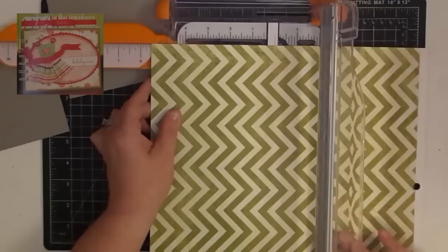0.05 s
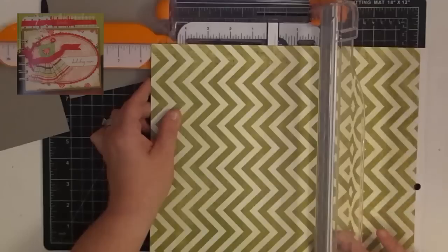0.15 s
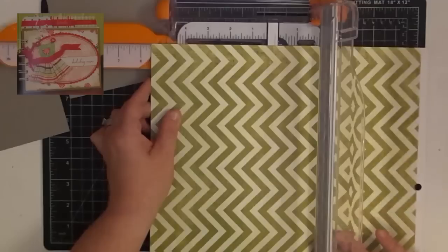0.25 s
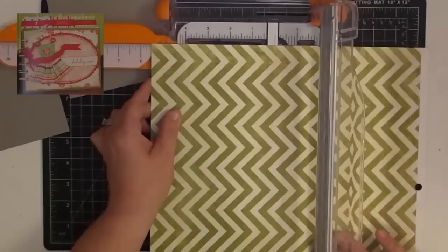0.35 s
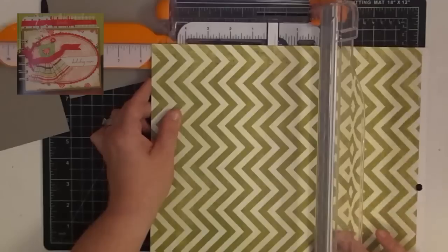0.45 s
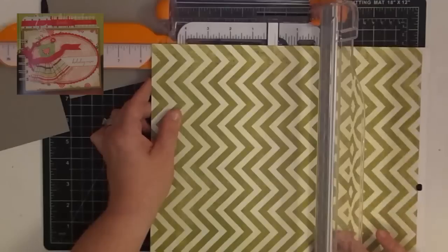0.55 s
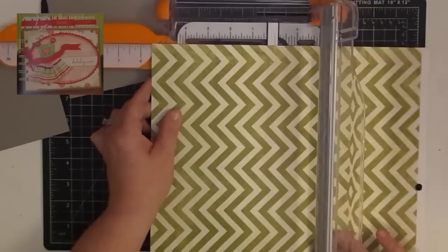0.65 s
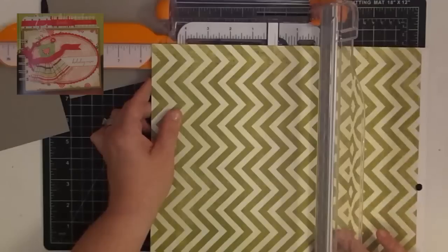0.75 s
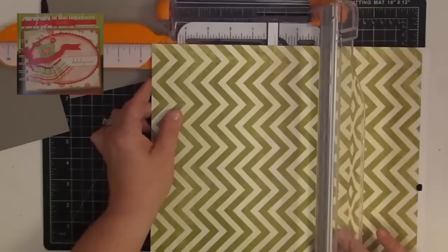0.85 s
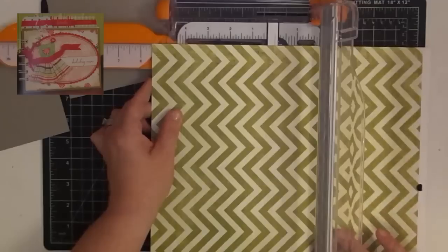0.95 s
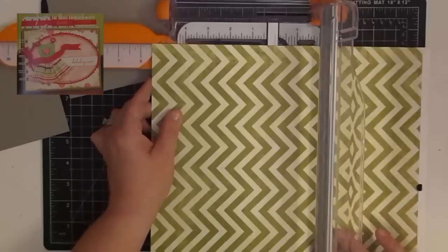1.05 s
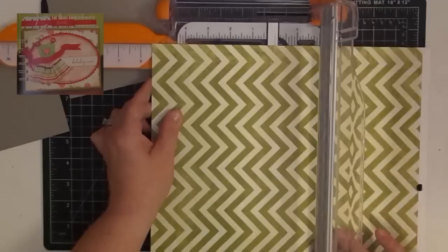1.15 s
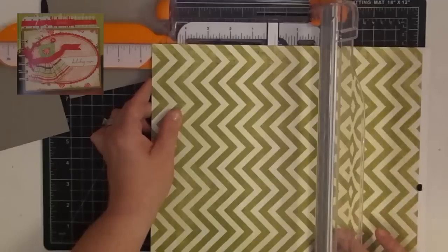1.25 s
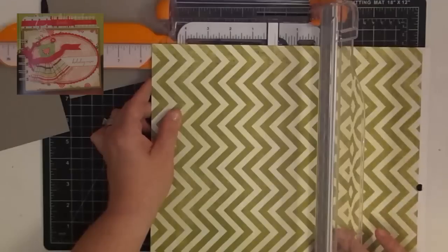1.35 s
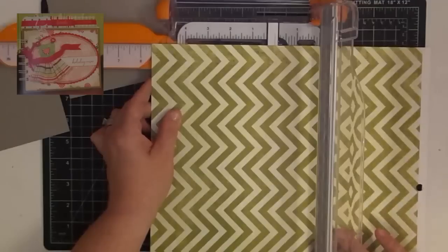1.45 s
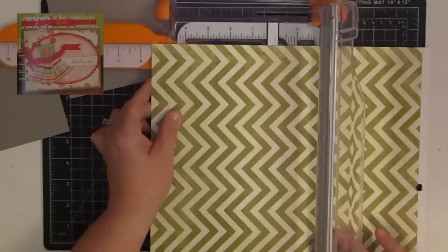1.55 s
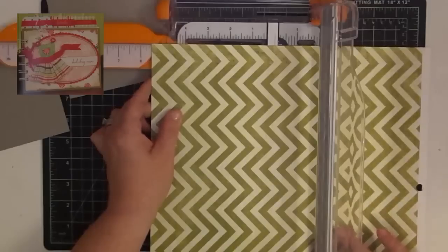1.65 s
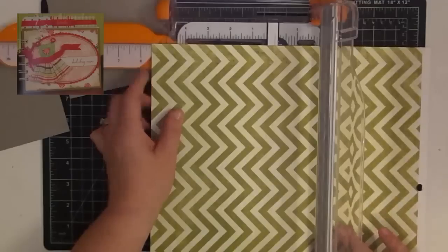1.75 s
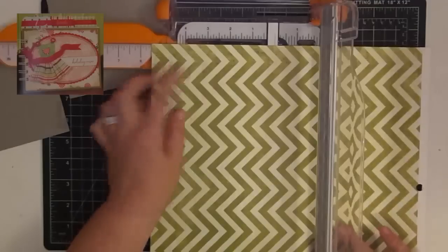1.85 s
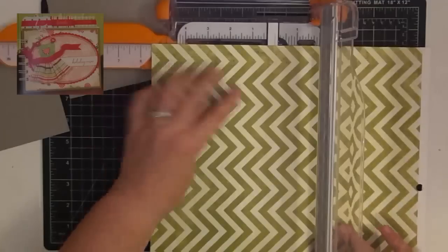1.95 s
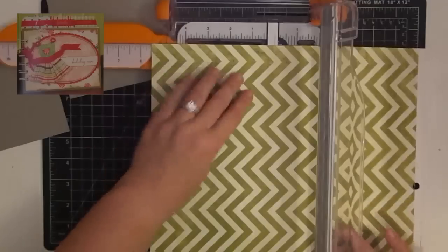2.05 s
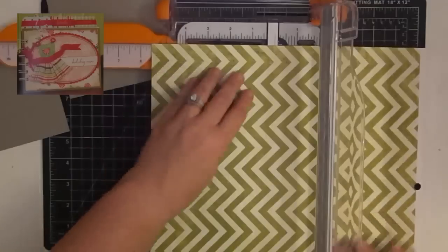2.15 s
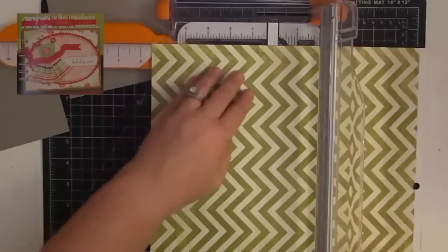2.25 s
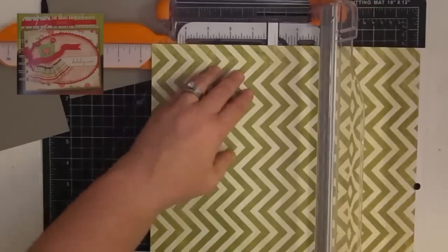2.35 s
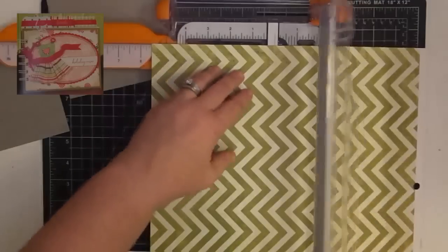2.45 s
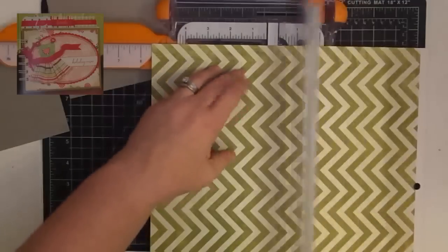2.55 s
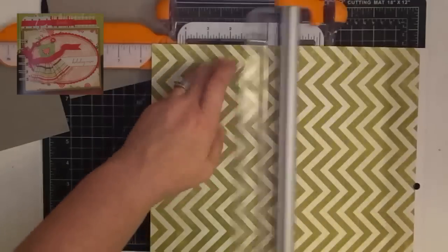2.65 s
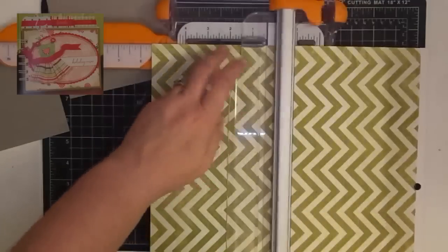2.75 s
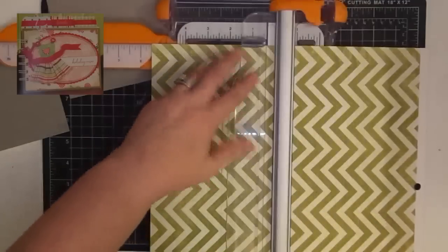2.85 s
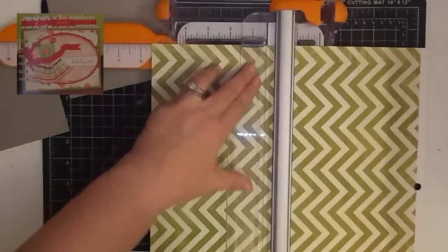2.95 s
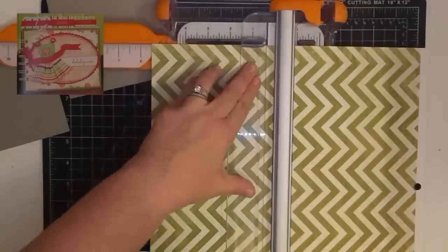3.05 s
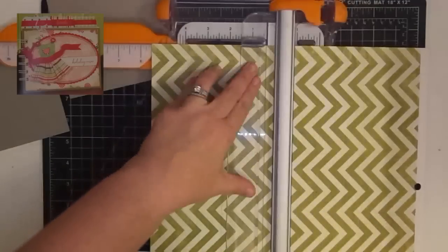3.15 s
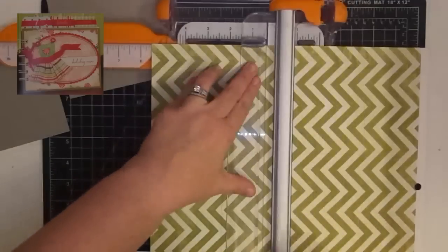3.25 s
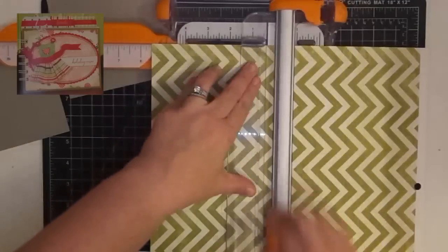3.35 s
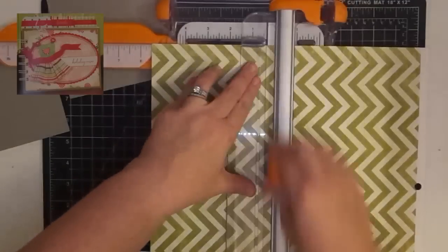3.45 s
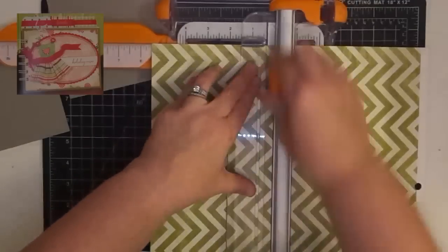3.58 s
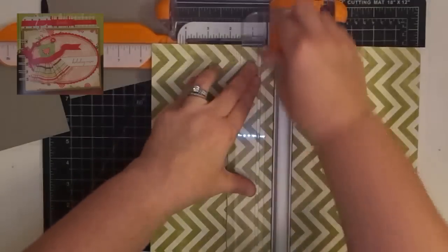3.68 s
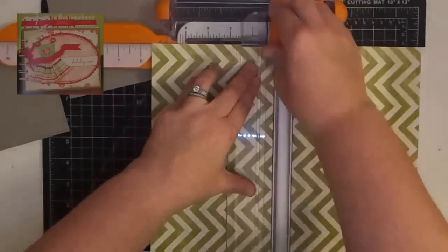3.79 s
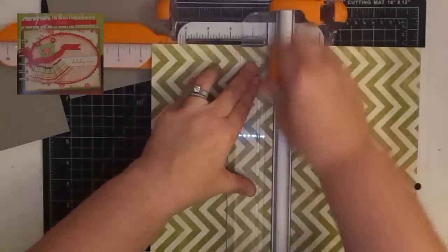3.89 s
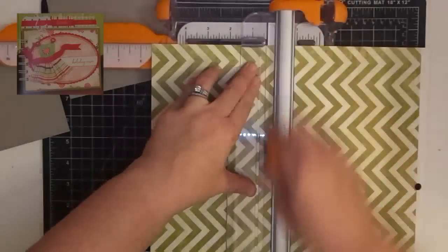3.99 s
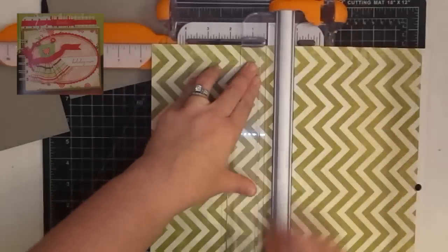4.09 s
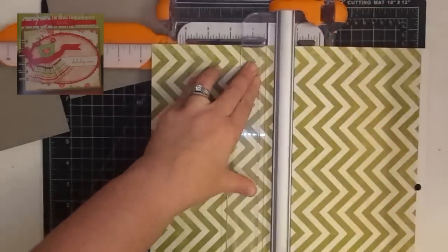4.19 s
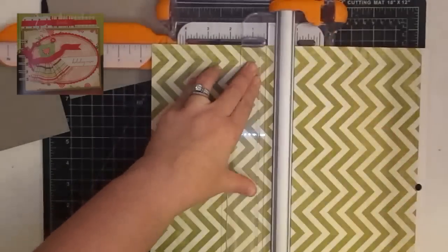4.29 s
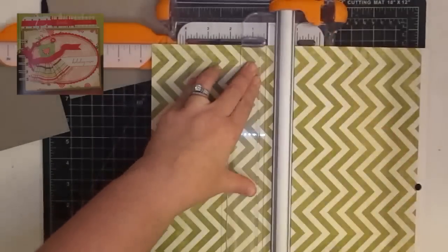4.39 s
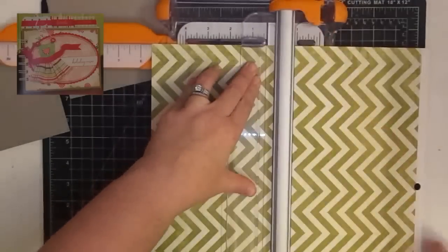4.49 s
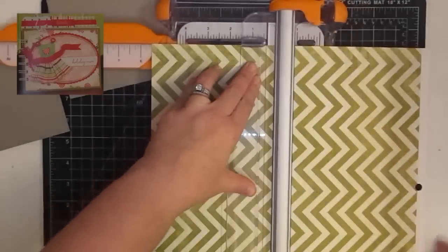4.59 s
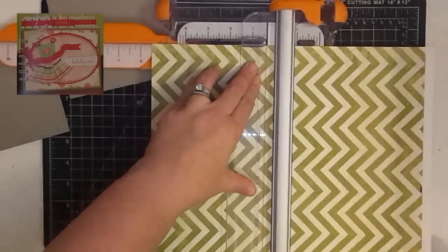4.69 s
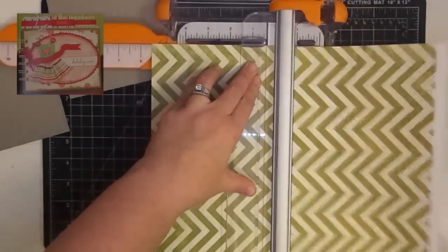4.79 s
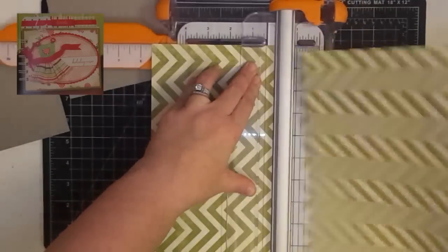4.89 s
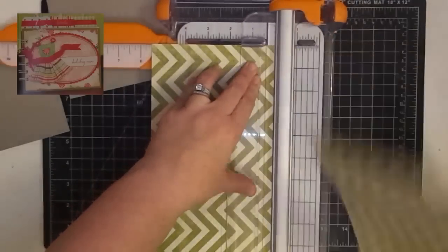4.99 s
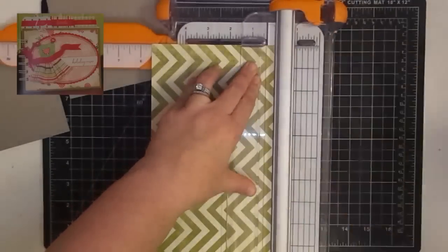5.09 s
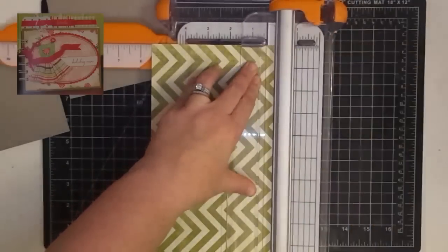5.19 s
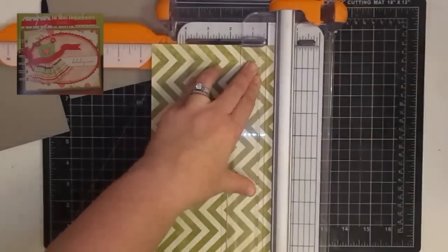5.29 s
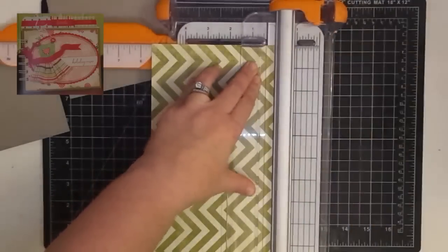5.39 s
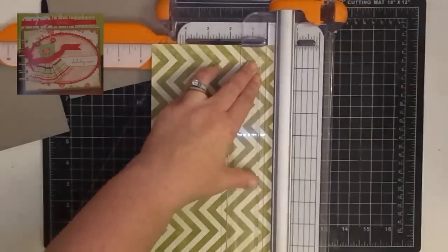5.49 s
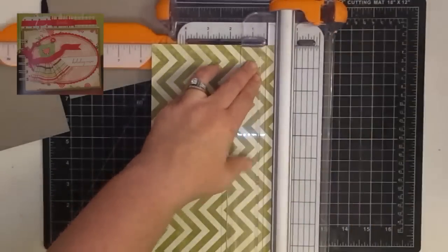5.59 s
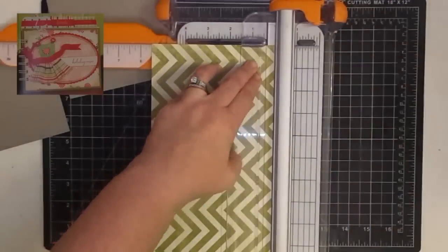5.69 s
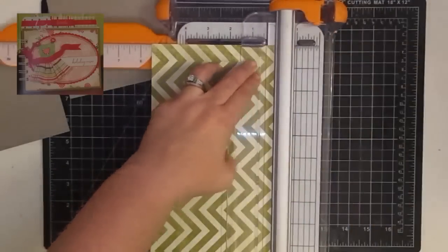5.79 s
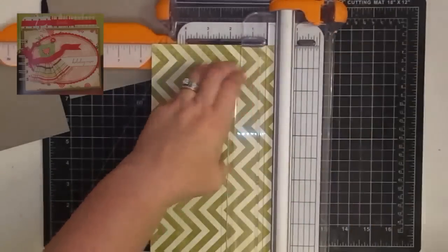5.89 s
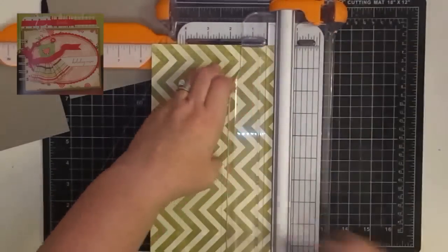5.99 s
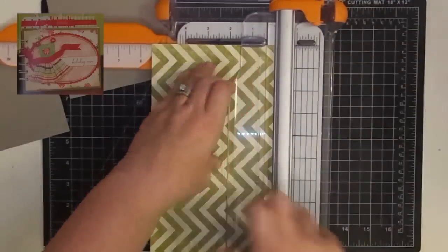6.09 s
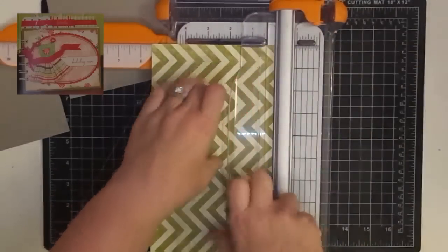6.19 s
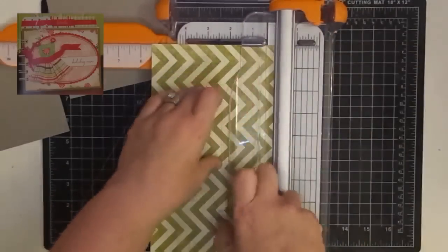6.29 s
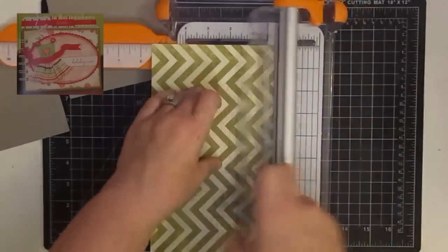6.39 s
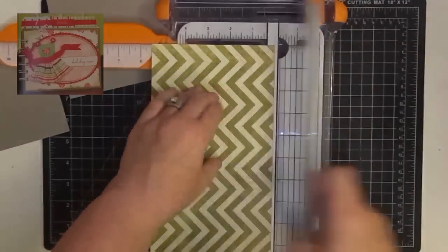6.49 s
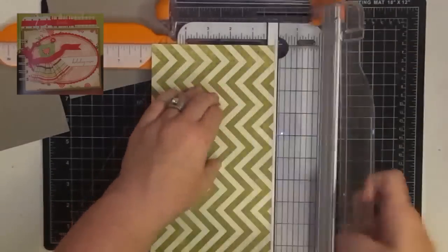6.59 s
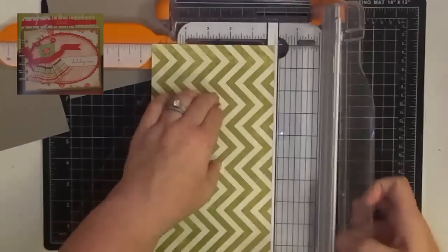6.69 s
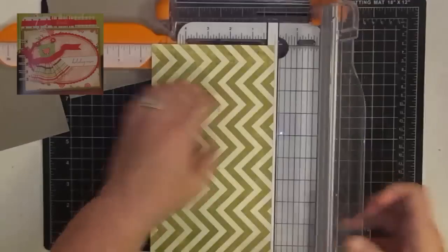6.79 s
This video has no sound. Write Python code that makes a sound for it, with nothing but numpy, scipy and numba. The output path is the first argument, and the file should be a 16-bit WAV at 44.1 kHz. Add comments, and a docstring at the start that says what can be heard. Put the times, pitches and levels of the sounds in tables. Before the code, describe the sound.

On a craft table, a paper trimmer is heard over low room noise. Faint rubbing leads to one very loud plastic slam with a short rattle and table thump. Small clicks precede a bright tearing scrape, then a quieter, rumblier slide back. Paper swishes and flicks as the cut piece is lifted; sparse soft knocks end it. One nearby microphone catches the short reflections of a small room.

```python
"""On a craft table in a small room, a plastic paper trimmer is heard by one microphone overhead.
A hand slides a sheet into place, the rail slams down and latches, the blade cuts and is drawn back.
The offcut is lifted and dropped aside, fingers shift on the sheet and the rail is swung open again.
Impacts excite decaying modes and bursts of tiny contacts; friction drives filters with random slips.
The walls spread these sounds in time, over steady air, hiss and hum."""
import sys
import numpy as np
from scipy import signal
from scipy.fft import rfft, irfft
from scipy.io import wavfile
from scipy.ndimage import uniform_filter1d
from numba import njit

SR = 44100
rng = np.random.default_rng(int(sys.argv[2]) if len(sys.argv) > 2 else 0)


def to_wav(s):
    """Save 16-bit WAV."""
    ch = np.atleast_2d(s).T  # columns
    pcm = np.round(np.clip(ch, -1, 1) * 32767)  # PCM
    wavfile.write(sys.argv[1], SR, pcm.astype(np.int16))


N = 301413
TIME = np.arange(N) / SR  # s
RING = TIME[:SR // 3]  # time axis of one impact or room response, s


def undb(db):
    """Level law: decibels to amplitude gain."""
    return 10 ** (np.asarray(db) / 20)


def unit(x):
    """Normalisation: scale to rms 1."""
    return x / np.sqrt(np.mean(x ** 2))


def fade(t60):
    """Exponential damping: a loss of 60 dB in t60 seconds."""
    return np.exp(-np.log(1000) * RING / max(t60, 1 / SR))


def swell(middle_s, length_s):
    """Gaussian envelope: a smooth rise and fall, down to exp(-2) at either end of length_s."""
    return np.exp(-2 * (2 * (TIME - middle_s) / length_s) ** 2)


def add(out, start_s, x):
    """Superposition: mix x into out from start_s."""
    i = int(start_s * SR)
    out[i:i + len(x)] += x[:len(out) - i]


def causal(gain):
    """Minimum phase: the promptest impulse response with these gains from 0 Hz to SR / 2."""
    cepstrum = irfft(np.log(gain))
    # doubling the first half of the cepstrum puts all the energy as early as possible
    folded = 2 * rfft(cepstrum[:len(gain) - 1], len(cepstrum)) - cepstrum[0]
    return irfft(np.exp(folded))


def colour(x, points):
    """Linear filtering by an outline of (pitch_hz, level_db), then scaling to rms 1."""
    hz, db = np.transpose(points)
    f = np.linspace(1, SR / 2, 2049)
    gain = undb(np.interp(np.log(f), np.log(hz), db))
    return unit(signal.fftconvolve(x, causal(gain))[:len(x)])


def walk(rate_hz):
    """Smoothed random process: steps drawn at rate_hz and joined by ramps, rms 1."""
    size = int(SR / rate_hz)
    steps = np.repeat(rng.standard_normal(N // size + 1), size)
    return unit(uniform_filter1d(steps, size)[:N])


@njit
def resonate(x, hz, width):
    """Second-order resonance whose centre may move every sample; width is a share of the centre."""
    y, band, low = np.empty(len(x)), 0., 0.
    for i in range(len(x)):
        g = np.tan(np.pi * hz[i] / SR)
        v = (band + g * (x[i] - low)) / (1 + g * (g + width))
        band, low, y[i] = 2 * v - band, low + 2 * g * v, width * v
    return y


def modes(table, spread=0.):
    """Modal superposition: damped sines of alternating sign; spread detunes them at random per call."""
    chance = rng.standard_normal(len(table))
    out = np.zeros(len(RING))
    for k, (hz, db, t60) in enumerate(table):
        sine = np.sin(2 * np.pi * hz * (1 + spread * chance[k]) * RING)
        out += (-1) ** k * undb(db) * fade(t60) * sine
    return out


def grains(spread_db):
    """Stick-slip friction: dense tiny slips of very unequal size, rms 1."""
    return unit(rng.standard_normal(N) * undb(spread_db * rng.standard_normal(N)))


def small_body(x, corner_hz=130):
    """Radiation efficiency: a small plastic body radiates little bass."""
    return signal.sosfilt(signal.butter(2, corner_hz, "high", fs=SR, output="sos"), x)


# Spectrum of the steady air and hiss: pitch_hz [Hz], level_db [dB, relative]
AIR_SPECTRUM = [(25, -10.5), (60, -13.5), (100, -6.5), (160, -3.5), (330, -1.5), (700, 0), (950, 1.5),
                (1060, 3), (1400, -0.5), (2400, -3.5), (4500, -8.5), (15000, -10)]
# Hum and whine: pitch_hz [Hz], level_db [dB rms, before hum_db]
HUM_TONES = [(118.4, -80.5), (1028, -76)]


def background(air_db=-60, hum_db=-1, waver_db=-1.2):
    """Stationary noise of room air and microphone, with a faint mains hum and a thin wavering whine."""
    air = colour(rng.standard_normal(N), AIR_SPECTRUM) * undb(air_db + waver_db * walk(2.9))
    tones = np.zeros(N)
    for hz, db in HUM_TONES:
        # both tones waver slightly in pitch
        phase = 2 * np.pi * np.cumsum(hz * (1 + 0.0073 * walk(30))) / SR
        tones += undb(db + hum_db) * np.sqrt(2) * np.sin(phase)
    return air + tones


# Decay of the room: pitch_hz [Hz], t60_s [s]
ROOM_DECAY = [(150, .42), (600, 0.2), (2500, 0.23), (6000, 0.18), (14000, 0.24)]


def room(x, wet_db=-3, gap_s=0.0041):
    """Reverberation: close walls spread sound in time, decay varies with pitch, colour is evened out."""
    hz, t60 = np.transpose(ROOM_DECAY)
    f, _, cells = signal.stft(rng.standard_normal(len(RING)), SR, nperseg=256)
    age = np.linspace(0, RING[-1], cells.shape[1])
    cells = cells * np.exp(-np.log(1000) * age / np.interp(f, hz, t60)[:, None])
    tail = signal.istft(cells, SR)[1][:len(RING)] * (RING > gap_s)
    response = (RING == 0) + undb(wet_db) * tail / np.linalg.norm(tail)
    # the inverse of the smoothed spectrum keeps any pitch from being favoured
    power = uniform_filter1d(np.abs(rfft(response)) ** 2, size=40)
    response = signal.fftconvolve(response, causal(np.sqrt(power.mean() / power)))
    return signal.fftconvolve(x, response)[:N]


# Paper sliding under the hand: middle_s [s], length_s [s], hiss_db [dB], base_drone_db [dB]
PAPER_RUBS = [(2.09, 0.17, -63, -81), (2.27, 0.43, -58.5, -88), (2.329, 0.14, -54, -55),
              (2.404, 0.088, -63, -53), (2.51, 0.21, -61, -64), (2.672, 0.16, -54.5, -75),
              (3.15, 0.063, -49.5, -58), (4.427, 0.13, -46, -56.5), (4.6, 0.17, -60, -59.5),
              (4.75, 0.31, -57.5, -73), (4.855, 0.024, -48, -63.5), (4.905, 0.15, -40.5, -59),
              (5.477, 0.21, -54.5, -63), (5.709, 0.25, -56, -85), (5.981, 0.061, -53.5, -48),
              (6.291, 0.28, -58, -59), (6.533, 0.042, -65.5, -49), (6.78, 0.15, -59, -65)]
# Spectrum of the paper hiss: pitch_hz [Hz], level_db [dB, relative]
PAPER_SPECTRUM = [(150, 7), (400, 2), (1500, 3), (2600, 0.5), (4000, 0), (5500, -7.5), (9000, -7.5),
                  (12000, -7), (15000, -6)]
# Modes of the base on the table, also struck by blows: pitch_hz [Hz], level_db [dB, relative], t60_s [s]
BASE_MODES = [(200, -33.5, 0.03), (351.8, -15, 0.1), (540, -19, 0.028), (605.5, 1.5, 0.095),
              (728, -3, 0.069), (801, -10, 0.13), (872, -10.5, .13), (914.6, -2.5, 0.069),
              (1046, -3, 0.048), (1242, -18.5, 0.013), (1400, -8.5, 0.061), (1602, -12, 0.12),
              (2100, -15.5, 0.18)]


def rubs(grain_db=5, uneven_db=2, drone_t60=.06):
    """Friction excitation: sliding paper hisses and makes the hand-damped base drone."""
    hiss = colour(grains(grain_db), PAPER_SPECTRUM)
    damped_base = modes(BASE_MODES) * fade(drone_t60)
    drone = unit(signal.fftconvolve(grains(grain_db), damped_base)[:N])
    out = np.zeros(N)
    for middle_s, length_s, hiss_db, drone_db in PAPER_RUBS:
        out += swell(middle_s, length_s) * (undb(hiss_db) * hiss + undb(drone_db) * drone)
    return out * undb(uneven_db * walk(90))


def chatter(shape):
    """Repeated contact: a noise burst that follows shape and holds every pitch about equally."""
    burst = rng.standard_normal(len(RING)) * shape
    for _ in range(3):  # flatten the spectrum, then shape the time course again
        spectrum = rfft(burst)
        burst = irfft(spectrum / (np.abs(spectrum) + 1e-12), len(RING)) * np.sqrt(shape)
    return burst


# Spectrum of the contact crack: pitch_hz [Hz], level_db [dB, relative]
CRACK_SPECTRUM = [(100, -5), (230, -4), (400, 2.5), (1500, 6.5), (2200, 1.5), (4400, 4.5), (6500, -6.5),
                  (7600, -1), (9000, -4), (11000, -1), (12000, 1), (13000, -1.5), (15000, -8.5)]
# Modes of the clear plastic rail: pitch_hz [Hz]
RAIL_PITCHES = [1307, 1430, 1625, 1700, 1950, 2357, 2814, 3160, 3520, 3650, 4010, 3920]


def blows(table, ring_width=.3, snap_db=0, snap_t60=0.016, rise_share=0.14,
          rail_db=-14, rail_t60=0.044, reach=0.2):
    """Impact excitation: a contact crack, a rattle of the struck part, a ringing rail, a thud of the base."""
    out = np.zeros(N)
    for start_s, crack_db, thud_db, hz, ring_db, t60 in table:
        # loose parts take a moment to settle into contact, so long rattles start softly
        decay = fade(t60) + undb(snap_db) * fade(snap_t60)
        shape = decay * (1 - fade(rise_share * t60)) ** 2
        centre = np.full(len(RING), float(hz))
        narrowed = resonate(chatter(shape), centre, float(ring_width))
        rattle = unit(resonate(narrowed, centre, 0.86))
        crack = colour(chatter(shape), CRACK_SPECTRUM)
        # a longer rattle carries more energy
        size = np.sqrt(np.mean(fade(t60) ** 2))
        # the rail's modes answer less the farther they lie from the pitch of the struck part
        rail = modes([(f, rail_db - 10 * (np.log(f / hz) / reach) ** 2, rail_t60) for f in RAIL_PITCHES])
        blow = undb(crack_db) * size * crack
        blow += undb(ring_db) * (size * rattle + rail)
        blow += undb(thud_db) * modes(BASE_MODES, spread=0.013)
        add(out, start_s, blow)
    return out


# Spectrum of the base pressing the cutting mat: pitch_hz [Hz], level_db [dB, relative]
MAT_SPECTRUM = [(50, -19.5), (120, -9.5), (200, -6.5), (330, -0.5), (480, -8.5), (900, -21.5), (2500, -44)]


def mat(presses, rise_t60=0.0027, mat_t60=0.13):
    """Damped compression: each (start_s, level_db) press into the cutting mat gives a dull bump."""
    out = np.zeros(N)
    for start_s, db in presses:
        bump = colour(rng.standard_normal(len(RING)), MAT_SPECTRUM)
        add(out, start_s, undb(db) * bump * fade(mat_t60) * (1 - fade(rise_t60)))
    return out


# Soft bumps on the trimmer: hand, sheet, and the blade leaving the paper.
# start_s [s], level_db [dB], ring_hz [Hz]
SOFT_BUMPS = [(2.099, -55.5, 715), (2.559, -50.5, 640), (2.627, -50.5, 1040), (3.142, -42, 1300),
              (3.738, -44, 910), (4.984, -36, 1190), (5.431, -46.5, 1460), (5.734, -61, 730),
              (5.903, -40.5, 740), (6.564, -43, 1900), (6.603, -41.5, 1290), (6.805, -46, 900)]


def bumps(crack_db=-10.5, ring_db=0, mat_db=-5.5, t60=0.083):
    """Soft impact: contacts thud through the base and press it into the mat; levels are against the thud."""
    thuds = blows([(s, db + crack_db, db, hz, db + ring_db, t60) for s, db, hz in SOFT_BUMPS])
    return small_body(thuds) + mat([(s, db + mat_db) for s, db, _ in SOFT_BUMPS])


# Light clicks of loose plastic and paper edges: start_s [s], level_db [dB], ring_hz [Hz], rattle_t60_s [s]
LIGHT_CLICKS = [(2.043, -52.5, 4200, 0.019), (2.738, -46, 1400, 0.049), (2.875, -38, 3940, 0.074),
                (2.951, -42.5, 2210, 0.084), (3.03, -36, 2160, 0.11), (3.263, -29.5, 4460, 0.0089),
                (3.778, -30, 2340, 0.047), (3.783, -39.5, 1650, 0.085), (3.984, -35.5, 4900, 0.035),
                (4.137, -36, 4500, 0.014), (4.406, -37.5, 3560, 0.11), (4.418, -31, 2420, 0.071),
                (4.523, -48.5, 2440, 0.034), (4.859, -39, 3770, 0.076), (4.871, -36, 2150, 0.053),
                (4.944, -33, 3720, 0.039), (6.111, -53.5, 3523, 0.069), (6.262, -50.5, 3930, 0.032),
                (6.522, -52.5, 2310, .11), (6.581, -43.5, 2390, 0.017), (6.63, -42.5, 3070, .03)]


def clicks(crack_db=0, thud_db=-15.5):
    """Hard impact: light contacts crack and ring but hardly move the base; levels are against the ring."""
    return blows([(s, db + crack_db, db + thud_db, hz, db, t60) for s, db, hz, t60 in LIGHT_CLICKS])


# Heavy blows: the rail slams, bounces and latches, the carriage hits its stop, the offcut snaps up and lands.
# start_s [s], crack_db [dB], base_thud_db [dB], ring_hz [Hz], ring_db [dB], rattle_t60_s [s]
HEAVY_BLOWS = [ (2.7519, -22, -50, 3160, -16, 0.015), (2.755, -3, -12, 3000, -16.5, 0.019),
               (2.757, -14.5, -26, 1190, -10.5, 0.034), (2.764, -28, -37, 900, -19, .05),
               (2.8809, -21.5, -48, 3870, -21, 0.02), (2.8867, -27.5, -28, 510, -27, 0.018),
               (4.2985, -40, -32.5, 3270, -21.5, 0.028), (4.3002, -42, -44, 6600, -33.5, 0.027),
               (4.851, -30, -34.5, 3230, -38, 0.059), (4.9152, -31.5, -32.5, 540, -21.5, 0.015),
               (4.9474, -44, -47, 1240, -16.5, 0.023)]
# Modes of the table under the slam: pitch_hz [Hz], level_db [dB], t60_s [s]
TABLE_MODES = [(27.9, -48, 0.29), (41, -45, 0.45), (54, -46, 0.22), (78, -46.5, 0.098), (124, -51.5, .15)]


def knocks(slam_s=2.756, mat_db=-22.5):
    """Coupled impact: heavy blows ring the trimmer and press the mat; the slam shakes the table too."""
    out = small_body(blows(HEAVY_BLOWS), corner_hz=210)
    out += mat([(s, thud_db + mat_db) for s, _, thud_db, *_ in HEAVY_BLOWS])  # against the thud
    add(out, slam_s, modes(TABLE_MODES))
    return out


# Control of rail pitch and end damping: time_s [s], height [0 = low pitch, 1 = high pitch]
RAIL_PITCH_CONTROL = [(3.19, 0), (3.78, 0.98), (3.87, 0.28), (4.13, .4), (4.2, 0), (4.3, 0.042)]
# The cut and the lighter return:
# start_s [s], end_s [s], attack_s [s], release_s [s], fibre_hiss_db [dB], rail_ring_db [dB], rumble_db [dB]
BLADE_STROKES = [(3.188, 3.781, 0.21, 0.06, -31, -39.5, -52), (3.847, 4.303, 0.13, 0.044, -41, -46, -42.5)]
# Brief catches of the carriage, scraping at one pitch: middle_s [s], length_s [s], pitch_hz [Hz], level_db [dB]
CARRIAGE_SCRAPES = [(3.305, 0.18, 1500, -34), (3.532, 0.036, 1950, -34), (3.58, 0.07, 2900, -33.5),
                    (4.237, 0.034, 1640, -38)]
# Spectrum of parting fibres: pitch_hz [Hz], level_db [dB, relative]
FIBRE_SPECTRUM = [(150, -22), (450, -7.5), (700, -4.5), (1400, 5), (4300, 2.5), (5300, -2.5), (6700, -1),
                  (9000, -1.5), (12000, 1), (15000, -4.5)]
# Spectrum of the carriage rumble in the base: pitch_hz [Hz], level_db [dB, relative]
RUMBLE_SPECTRUM = [(50, -31), (110, -6), (190, 5), (275, -3.5), (342, 5.5), (440, -8.5), (600, -2),
                   (1000, -9), (2500, -54)]


def blade(grain_db=4, judder_db=1.0, rail_width=0.33, surge_db=1.0, scrape_width=0.097, scrape_hiss_db=-7):
    """Friction and moving resonance: fibres part with a hiss, the carriage rings the rail and rumbles."""
    end_hiss_db, end_rumble_db = -3.5, -6.5  # damping at height 0 or 1, against height 0.5
    rail_hz, rail_rise_octaves = 1520, 0.75  # lower resonance at height 0, its rise up to height 1
    upper_ratio, upper_db = 1.63, -2.5  # the upper resonance against the lower
    stroke_fade_db = 19  # depth of attack and release
    height = np.interp(TIME, *np.transpose(RAIL_PITCH_CONTROL))
    end_damping = (2 * height - 1) ** 2  # 1 at height 0 or 1, 0 halfway
    slips = grains(grain_db)
    lower_hz = rail_hz * 2 ** (rail_rise_octaves * height)
    upper_hz = upper_ratio * lower_hz
    lower = unit(resonate(resonate(slips, lower_hz, float(rail_width)), lower_hz, 1.))
    upper = unit(resonate(resonate(slips, upper_hz, float(rail_width)), upper_hz, 1.))
    # each resonance surges on its own as the grip changes
    rail = undb(surge_db * walk(25)) * lower + undb(upper_db + surge_db * walk(27)) * upper
    rail /= np.hypot(1, undb(upper_db))
    fibres = colour(grains(grain_db), FIBRE_SPECTRUM)
    rumble = colour(slips, RUMBLE_SPECTRUM) * undb(end_rumble_db * end_damping)
    out = np.zeros(N)
    for start, end, attack, release, hiss_db, ring_db, rumble_db in BLADE_STROKES:
        slack = np.interp(TIME, [start, start + attack, end - release, end], [1, 0, 0, 1])
        sliding = (undb(hiss_db) * fibres + undb(ring_db) * rail) * undb(end_hiss_db * end_damping)
        sliding += undb(rumble_db) * rumble
        out += sliding * undb(-stroke_fade_db * slack) * (TIME > start) * (TIME < end)
    catches = grains(grain_db)
    for middle_s, length_s, hz, db in CARRIAGE_SCRAPES:
        squeal = unit(resonate(catches, np.full(N, float(hz)), float(scrape_width)))
        out += undb(db) * swell(middle_s, length_s) * (squeal + undb(scrape_hiss_db) * fibres)
    # the carriage never runs quite evenly
    return out * undb(judder_db * walk(220))


def scene():
    """Superposition: everything on the table sounds through the room into one microphone."""
    table = small_body(rubs(), corner_hz=298) + bumps() + small_body(clicks()) + knocks() + blade()
    return np.tile(room(table) + background(), (2, 1))


def record(dry, top_hz=15200, offset=-.0006):
    """Band-limiting: the recorder clips at full scale, cuts the top and has a slight offset."""
    low_pass = signal.ellip(12, .1, 95, top_hz, fs=SR, output="sos")
    return signal.sosfilt(low_pass, np.clip(dry, -1, 1)) + offset


dry = scene()
out = record(dry)
to_wav(out)
```